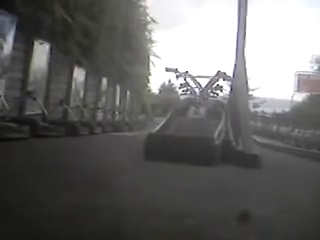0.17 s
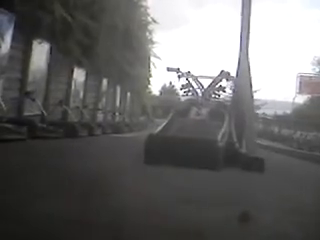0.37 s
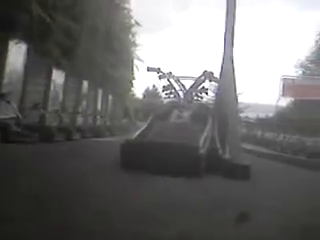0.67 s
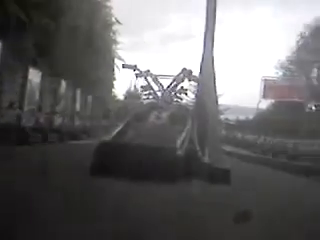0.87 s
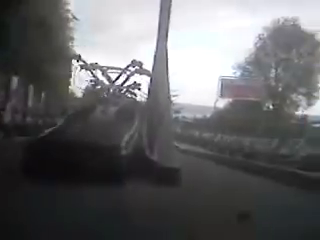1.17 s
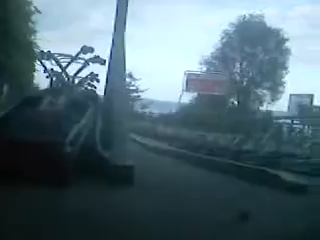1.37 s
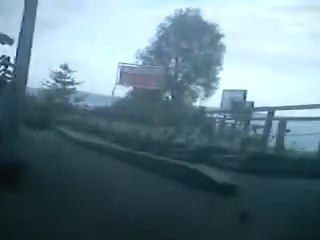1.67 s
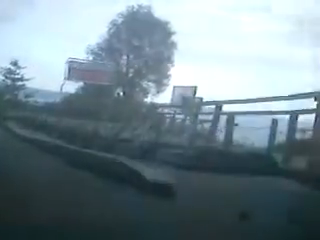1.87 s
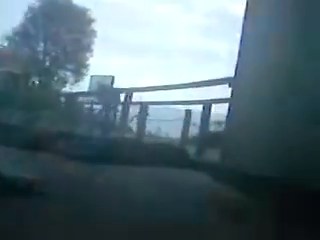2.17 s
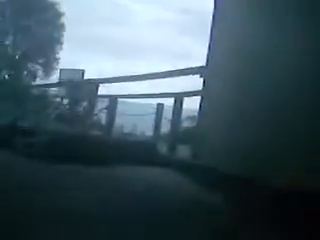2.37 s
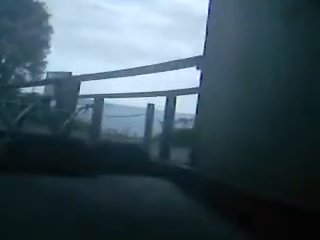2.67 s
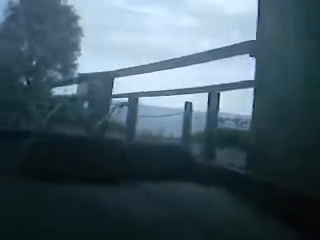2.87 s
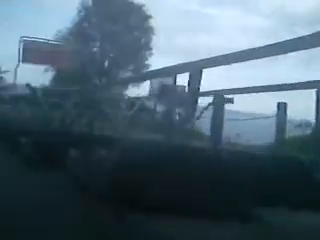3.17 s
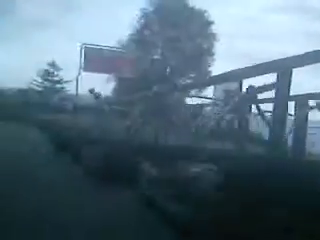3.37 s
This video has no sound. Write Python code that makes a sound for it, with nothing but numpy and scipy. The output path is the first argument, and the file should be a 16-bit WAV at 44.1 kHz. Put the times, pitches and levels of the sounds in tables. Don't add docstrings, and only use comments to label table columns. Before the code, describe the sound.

A small plastic cart starts almost quiet, with quick brake scuffs and light taps until 0.4 s. Hard wheels then rattle over gritty paving, with hollow bonks until 0.9 s and low frame thumps from 0.6 s. Irregular knocks continue; high ticks thicken after 1.8 s. From 2.3 s it turns rougher, brighter and windier, bumps clipping the attached microphone, worst from 2.9 s, still rolling at 3.5 s.

```python
import sys
import numpy as np
from scipy import signal
from scipy.io import wavfile
from scipy.ndimage import uniform_filter1d

SR = 44100
rng = np.random.default_rng(int(sys.argv[2]) if len(sys.argv) > 2 else 0)


def linear_from_db(decibels):
    return 10 ** (np.asarray(decibels, float) / 20)


def master(y):
    cut = np.clip(np.atleast_2d(y).T, -1, 1)
    pcm = np.round(cut * 32767)
    wavfile.write(sys.argv[1], SR, pcm.astype(np.int16))


N = 154791

# t/s, frame level/dB, wind level/dB
LOAD = [
    (0.0, -53, -55),
    (.3, -41.5, -42.5),
    (.55, -42, -54),
    (0.94, -35, -38),
    (1.5, -36.5, -41.5),
    (1.8, -33, -37.5),
    (2.1, -28, -38),
    (2.6, -31, -32.5),
    (3, -21, -29),
    (3.51, -26, -26),
]
GRAIN_SPREAD_DB = 3.2


def evened(x):
    return x / np.sqrt(np.mean(x ** 2) + 1e-20)


def curve(rows, column):
    rows = np.array(rows)
    return np.interp(np.arange(N) / SR, rows[:, 0], rows[:, column])


def add(mix, s, sound):
    part = mix[max(round(s * SR), 0):][:len(sound)]
    part += sound[:len(part)]


def wander(per_s):
    return evened(signal.lfilter(*signal.butter(2, per_s, fs=SR), rng.standard_normal(N)))


def resonate(x, hz, width_hz):
    turn = np.exp(2j * np.pi * hz * np.arange(len(x)) / SR)
    r = np.exp(-np.pi * width_hz / SR)
    return 2 * (turn * signal.lfilter([1 - r], [1, -r], x / turn)).real


def tilt(x, bright_db):
    def half(kind):
        once = signal.butter(2, 1800, kind, fs=SR, output="sos")
        return signal.sosfilt(np.tile(once, (2, 1)), x)
    return half("low") + linear_from_db(bright_db) * half("high")


def shell(x):
    # f/Hz, level/dB (per Hz)
    colour = [(120, -30), (200, -4), (262, 1), (449, 5.5), (537, -0.5), (850, -1.5), (1500, -7.5),
              (2960, -16), (3780, -22.5), (4300, -38.5), (5590, -61.5), (9460, -120)]
    # f/Hz, width/Hz, level/dB
    panels = [(354, 90, -16), (461, 35, -8), (656, 34, 0), (1180, 25, -7.5), (2160, 67, -20.5),
              (2650, 130, -15.5)]
    f, db = np.transpose(colour)
    hz = abs(np.fft.fftfreq(4096, 1 / SR))
    log_gain = np.log(linear_from_db(np.maximum(np.interp(np.log(hz + 1), np.log(f + 1), db), -70)))
    spectrum = np.exp(log_gain - 1j * signal.hilbert(log_gain).imag)
    taps = np.fft.ifft(spectrum).real[:2048]
    x = x + sum(linear_from_db(db) * resonate(x, hz, width) for hz, width, db in panels)
    return signal.oaconvolve(x, taps / np.linalg.norm(taps))[:N]


def wind():
    hz, width_hz, lumps_db = 48.4, 10, 2
    air = rng.standard_normal(N) * linear_from_db(lumps_db * wander(5.6))
    main = resonate(resonate(air, hz, width_hz), hz, width_hz)
    deep = resonate(resonate(air, 29, 40), 29, 40)
    return linear_from_db(curve(LOAD, column=2) + 1.5) * evened(main + 0.2 * deep)


def scuffs():
    # t/s, length/s, level/dB, brightness/dB
    drags = [
        (0.016, 0.059, -38, 7),
        (0.078, 0.018, -39, 3),
        (0.098, 0.028, -41, 7.5),
        (0.219, 0.058, -53, -5.5),
        (0.349, 0.053, -43, 4.5),
    ]
    # f/Hz, width/Hz, level/dB
    pad_rings = [(500, 27, 2), (1100, 120, 15.7), (2250, 140, 2), (3170, 2700, 2.7)]
    slips_per_s, edge_s = 210, 0.0036
    out = np.zeros(N)
    for s, length, db, bright_db in drags:
        t = np.arange(0, length, 1 / SR)
        noise = rng.standard_normal((2, 4000))
        pace = slips_per_s * (1 + 3.6 * uniform_filter1d(noise[0], 150))
        slips = np.cumsum(pace)[:len(t)] / SR
        slip_level = 0.43 + np.exp(-(slips % 1) / 0.26)
        edge = np.clip(np.minimum(4 * t, length - t) / edge_s, 0, 1)
        rub = evened(slip_level * noise[1, :len(t)])
        add(out, s, tilt(linear_from_db(db) * edge * rub, bright_db))
    return out + sum(linear_from_db(db) * resonate(out, hz, width) for hz, width, db in pad_rings)


def frame(blows):
    # f/Hz, width/Hz, level/dB
    modes = [(161.9, 30, 5), (131, 27, -22.5), (204, 52, -9.5)]
    thud_db = -5.5

    def drum(x):
        return sum(linear_from_db(db) * resonate(resonate(x, hz, 3 * width), hz, width) for hz, width, db in modes)
    road = rng.standard_normal(N) * linear_from_db(0.5 * wander(6.5))
    rumble = linear_from_db(curve(LOAD, column=1) + 2.0) * evened(drum(road))
    return rumble + linear_from_db(thud_db + 19.5) * drum(blows)


def rings(rows, gain_db, cycles):
    out, t = np.zeros(N), np.arange(9000) / SR
    for s, db, hz in rows:
        turns = hz * t
        swell = np.minimum(turns / 1.9, 1)
        fade = linear_from_db(db + gain_db - 60 * turns / cycles)
        add(out, s, fade * swell * np.sin(-2 * np.pi * turns))
    return out


def thumps():
    # t/s, peak level/dB, f/Hz
    blows = [(0.64, -19, 159.7), (0.861, -17.5, 154), (1.033, -16, 151), (1.113, -15, 161),
             (1.314, -15.5, 163), (1.461, -20, 164), (1.514, -14, 159), (1.629, -12.5, 152.3),
             (1.715, -26, 188), (1.873, -13.5, 173), (1.966, -10, 162), (2.058, -14, 161),
             (2.167, -19, 168.4), (2.252, -15, 166), (2.355, -11.5, 165.6), (2.558, -15.5, 146.4),
             (2.634, -15, 166), (2.742, -11, 162), (2.869, -14, 154.6), (2.965, -16, 162.5),
             (3.064, -20, 133.5), (3.17, -17.5, 132), (3.277, -18, 160), (3.38, -11, 156.6)]
    return rings(blows, gain_db=-3.5, cycles=33)


def bonks():
    # t/s, peak level/dB, f/Hz
    blows = [(0.214, -32, 555), (0.258, -23.5, 316), (0.354, -26.5, 300), (0.454, -13, 366),
             (0.527, -27, 450), (0.583, -23, 447), (0.628, -11.5, 448), (0.689, -24, 450),
             (0.723, -12.5, 460), (0.818, -19.5, 435), (0.854, -14, 680), (0.91, -9.5, 663),
             (2.561, -15, 393), (2.611, -12, 447), (2.68, -12, 422), (2.729, -14, 409), (2.864, -11.5, 444),
             (3.047, -7.5, 434), (3.3, -9.5, 442)]
    return rings(blows, gain_db=1, cycles=24.5)


def ticks():
    # t/s, peak level/dB, f/Hz
    blows = [(0.6544, -31, 2750), (1.1613, -29, 2720), (1.7714, -27, 2790), (1.7894, -24, 2220),
             (1.8357, -24.5, 2310), (1.8617, -28, 2770), (1.9584, -19.5, 2140), (2.0254, -21, 2180),
             (2.1454, -28, 2220), (2.1545, -21, 2200), (2.2154, -28, 2230), (2.3154, -28.5, 2740),
             (2.4438, -27.5, 2500), (2.6609, -18, 2430), (2.6848, -20.5, 3000), (2.7811, -19.5, 2180),
             (3.0979, -22, 2260), (3.2425, -18, 2240), (3.2814, -20.5, 2210), (3.3383, -19, 2110)]
    return rings(blows, gain_db=8.5, cycles=19.3)


def jolts():
    # t/s, width/ms, push level/dB
    bumps = [(1.0425, .5, 2.5), (2.3573, 1.1, -4), (2.3692, 3.1, -3.5), (2.4044, .4, -2), (2.5639, .6, 3),
             (2.7493, 1.1, 5), (2.8736, 3.1, -3), (2.8797, 1.1, 6), (2.8927, .7, -3), (2.989, 1.3, 1.5),
             (3.0172, 1.7, 1), (3.0493, 1.5, 10), (3.0728, 2.2, 2), (3.075, .55, -3), (3.08, 1.4, 12),
             (3.109, 1.9, 3), (3.1786, 1.1, 1), (3.195, 1.1, -6.5), (3.2161, 1.2, 8), (3.2847, .4, -4),
             (3.3233, 1.2, 2), (3.36, 1.7, 10), (3.3741, 5.4, -3), (3.3935, 3.1, 6), (3.4131, 1.7, -3),
             (3.4194, 1.8, 10), (3.4766, .8, -2)]
    edge_s = .0007
    rebound, rebound_hz, rebound_t60_s = 0.15, 128, 0.06
    out, pinned, t = np.zeros(N), np.zeros(N), np.arange(4000) / SR
    for s, ms, db in bumps:
        width = .88 * ms / 1000 + edge_s * min(1, linear_from_db(-db))
        ramp = np.clip(np.minimum(t, 0.83 * (width - t)) / edge_s, 0, 1)
        hold = np.sin(np.pi / 2 * ramp) ** 2
        after = np.maximum(t - width, 0)
        fade = linear_from_db(-60 * after / rebound_t60_s)
        swing = rebound * min(ms / 2, 1) * np.sin(2 * np.pi * rebound_hz * after) * fade
        add(out, s - width / 2, swing - linear_from_db(db) * hold)
        add(pinned, s - width / 2, hold)
    return out, np.minimum(pinned, 1)


def knocks():
    # t/s, peak level/dB, brightness/dB
    strikes = [(0.171, -31, 9), (0.206, -21, -0.5), (0.26, -34, 3), (0.352, -45, -5), (0.364, -23.5, 15),
               (0.434, -18, -10), (0.453, -5, -11), (0.501, -39, 3), (0.527, -7, -6), (0.583, -10, -3),
               (0.627, -10.5, -3), (0.687, -8.5, -0.5), (0.768, -22.5, 5), (0.817, -16, 2.5),
               (0.852, -23, 1.5), (0.88, -14.5, -1), (0.91, -10, -11.5), (0.928, -9.5, -17), (0.98, -34, 7),
               (0.995, -11, -9), (1.04, -13.5, 9.5), (1.072, -9, -18), (1.1, -17.5, -3), (1.248, -11, -6),
               (1.273, -22, 2), (1.286, -14, -4.5),
               (1.287, -7.5, -2.3), (1.346, -11, -4.5), (1.374, -14, 1.5), (1.407, -10, -0.5),
              (1.444, -15.5, 1), (1.465, -10, -5.5), (1.499, -12.5, 0), (1.522, -11, 0.5), (1.583, -20, 0),
              (1.641, -28, 3), (1.67, -36, 2), (1.694, -13, 2.5), (1.718, -22.5, 8), (1.735, -10, 5),
              (1.811, -10, 2.2), (1.895, -14.5, 1.5), (1.923, -13, 7.5), (1.945, -27, 3.8),
              (1.968, -12, 4.5), (1.99, -13.5, 2.9), (2.011, -10.5, 1.4), (2.032, -14.5, 2),
              (2.07, -15.5, 8.3), (2.112, -9, 4.4), (2.136, -9.5, 1.6), (2.164, -10, 4), (2.204, -15, 6),
              (2.232, -8.5, 1.3),
               (2.34, -9, 6.5), (2.354, -8.5, 9.3), (2.377, -10, 13.5), (2.403, -5.5, 2.4), (2.485, -23, 3.3),
            (2.51, -7.5, 6.6), (2.555, -5, 5), (2.556, -18.5, 5.4), (2.623, -13, 2.5), (2.645, -15, 2.1),
            (2.728, -22, 3.8), (2.748, -10.5, 3.5), (2.808, -14, 3.1), (2.845, -4, 5), (2.872, -11.5, 11),
            (2.989, -12, 3.7), (3.016, -5.5, 3.6), (3.048, -7, 14.5), (3.079, -13.5, 8.4),
            (3.136, -31, 2.3), (3.176, -18.5, 1.4), (3.193, -18.5, 18), (3.216, -22.5, 8.9),
            (3.304, -17, 1.3), (3.358, -4.5, 5.8), (3.411, -9.5, 7.4), (3.436, -7, 7.5), (3.475, -22, 1.2)]
    knock_db, rise_s = -3, 0.0015
    crack_t60_s, crack_low_hz, snap_level = .012, 850, 1.4
    tail_db, tail_t60_s = -13, 0.1
    out, t = np.zeros(N), np.arange(4000) / SR
    rows = strikes
    noise = rng.standard_normal((len(rows), len(t))) * np.minimum(t / rise_s, 1)
    snap = snap_level * np.exp(-(t / .00015 - 2) ** 2)
    crack = (noise + snap) * linear_from_db(-60 * t / crack_t60_s)
    crack = signal.lfilter(*signal.butter(2, crack_low_hz, "high", fs=SR), crack)
    crack = crack / np.linalg.norm(uniform_filter1d(crack, size=8), axis=1, keepdims=True)
    chatter = noise * linear_from_db(tail_db - 60 * t / tail_t60_s)
    for (s, db, bright_db), sound in zip(rows, 2 * crack + chatter):
        add(out, s, tilt(linear_from_db(db + knock_db) * sound, bright_db))
    return out


def stones(per_s):
    size = linear_from_db(GRAIN_SPREAD_DB * np.minimum(rng.exponential(1, N), 2.5))
    return size * (rng.random(N) < per_s / SR)


def pings():
    low_hz, high_hz, cycles, patches = 398, 1487, 8, 24
    size = stones(per_s=500)
    patch = rng.integers(0, patches, N)
    t, out = np.arange(2000) / SR, np.zeros(N)
    for k, hz in enumerate(np.geomspace(low_hz, high_hz, num=patches)):
        ring = np.sin(2 * np.pi * hz * t) * linear_from_db(-60 * t * hz / (2 * cycles))
        out += signal.oaconvolve(size * (patch == k), ring / np.linalg.norm(ring))[:N]
    return evened(out)


def grit():
    # t/s, grit level/dB, brightness/dB
    roll = [(0, -45.5, 8), (.13, -46, 8.5), (.25, -40.5, 5), (.33, -48, 10), (.42, -32.5, 2),
            (.445, -25.5, -3.5), (.8, -22, -5.5), (1.21, -21.5, -5), (1.24, -36, 4), (1.4, -24.5, -8.5),
            (1.54, -23.5, -4), (1.6, -30.5, 0.5), (2.08, -30.5, 0), (2.2, -21, -5.5), (2.3, -32, 6),
            (2.4, -21, 2.5), (2.5, -26.5, -8), (2.75, -21, -4), (2.96, -28, 3), (3.2, -20.5, 3),
            (3.51, -21.5, -2)]
    grain_t60_s, hiss_db, ping_db = .009, -9, -2.5
    clump_db, clumps_per_s = 2, 26
    power = signal.lfilter([1], [1, -linear_from_db(-120 / (grain_t60_s * SR))], stones(per_s=300) ** 2)
    bursts = evened(np.sqrt(power))
    blows = shell((bursts + linear_from_db(hiss_db)) * rng.standard_normal(N))
    clumps = linear_from_db(clump_db * np.clip(wander(clumps_per_s), -2.5, 1.5))
    drive = (evened(blows) + linear_from_db(ping_db) * pings()) * clumps
    return tilt(evened(drive) * linear_from_db(curve(roll, column=1)), curve(roll, column=2))


def scene():
    stiffen = .55
    blows = knocks()
    shoves, pinned = jolts()
    struck = ticks() + bonks() + thumps()
    ride = wind() + shell(blows + scuffs()) + frame(blows) + struck + grit()
    return ((1 - stiffen * pinned) * ride + shoves)[None]


def band_limit(x):
    return signal.sosfilt(signal.butter(12, 15850, fs=SR, output="sos"), x)


def record(dry):
    offset, settle_hz, edge_hz = -.047, 8, 4333
    soft_limit, crest_limit, hard_limit = .726, .44, .7
    x = dry + offset
    limit = np.where(x < 0, soft_limit, crest_limit)
    x = x / (1 + abs(x / limit) ** 8) ** (1 / 8)
    drift = signal.lfilter(*signal.butter(1, settle_hz, fs=SR), x - offset)
    x = x - drift * np.clip(1 + x / soft_limit, 0, 1)
    narrow = signal.firwin(401, edge_hz, window=("kaiser", 8.5), fs=SR)
    x = signal.oaconvolve(np.pad(x, ((0, 0), (200, 200)), "edge"), narrow[None], "valid")
    return band_limit(np.maximum(x, -hard_limit))


dry = scene()
out = record(dry)
master(out)
```